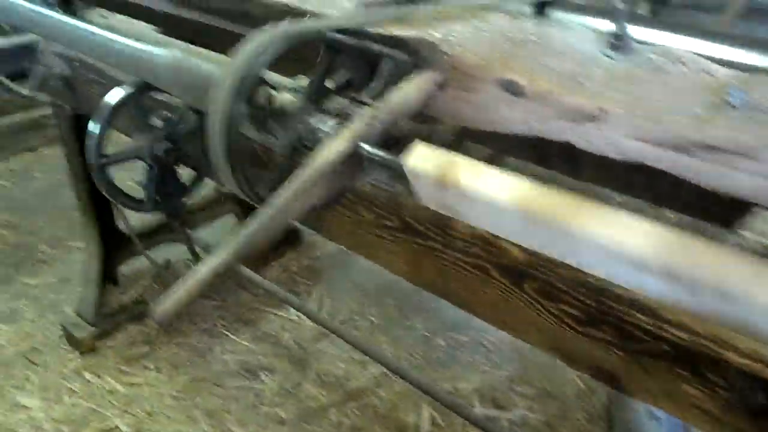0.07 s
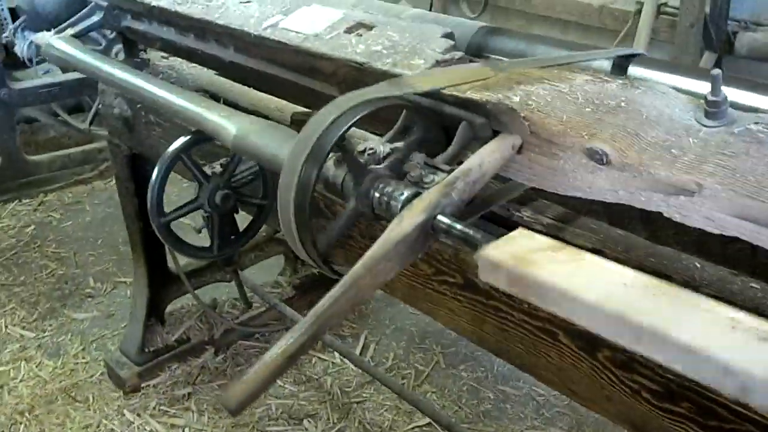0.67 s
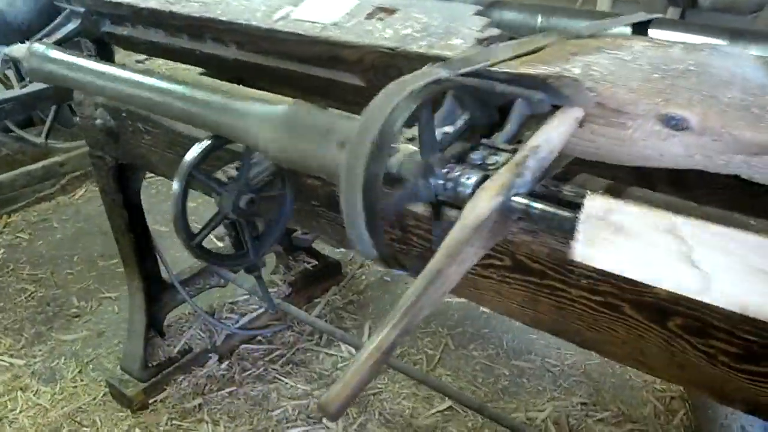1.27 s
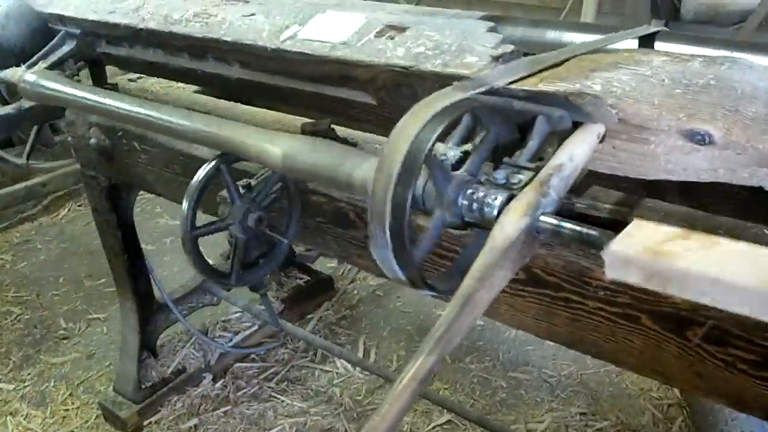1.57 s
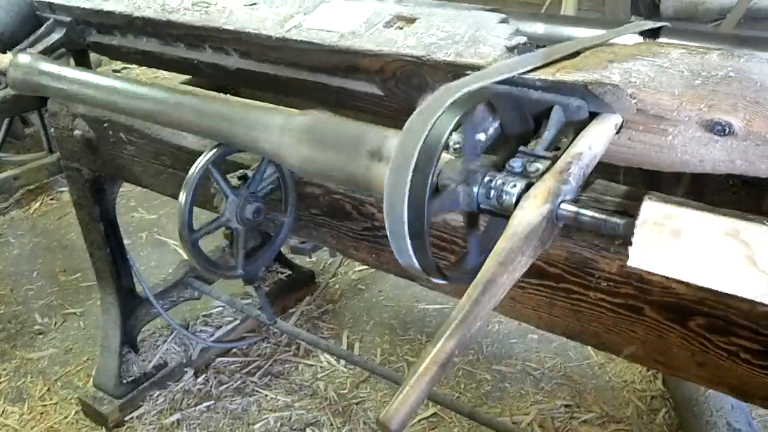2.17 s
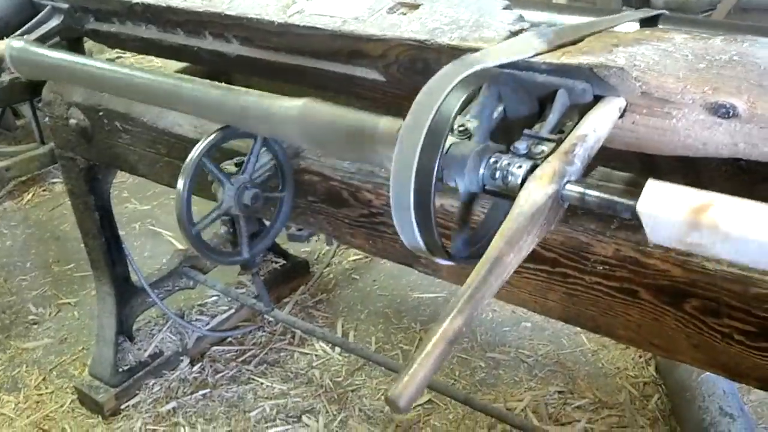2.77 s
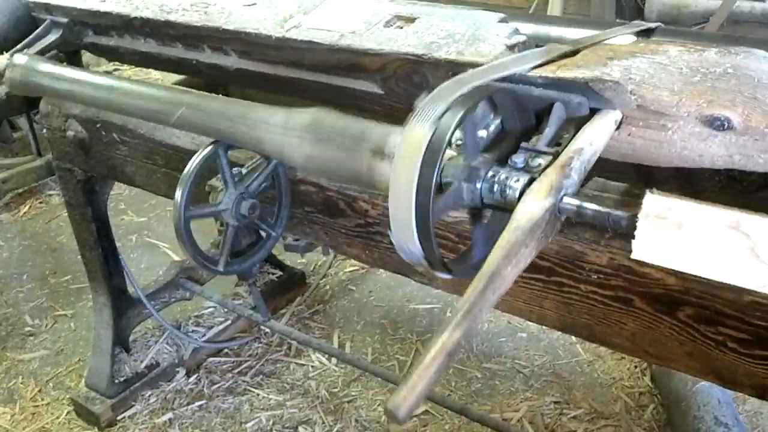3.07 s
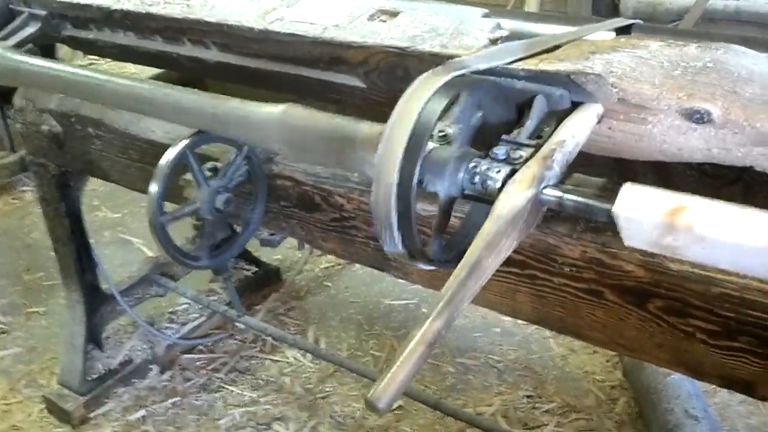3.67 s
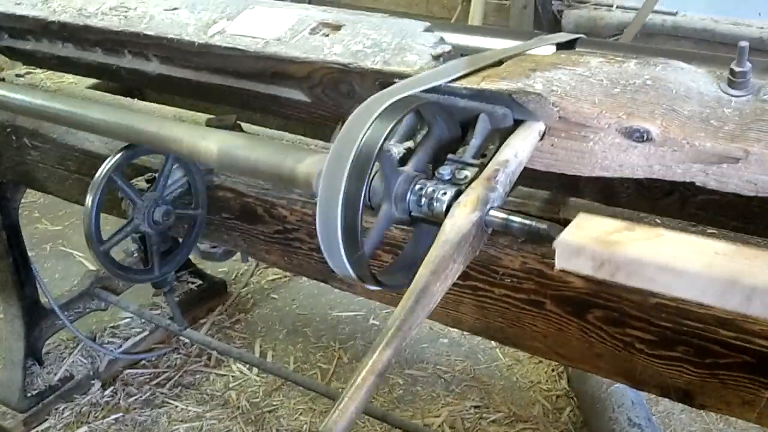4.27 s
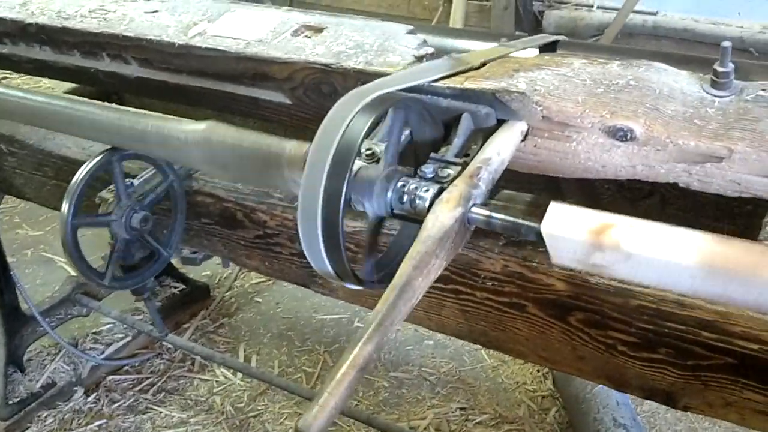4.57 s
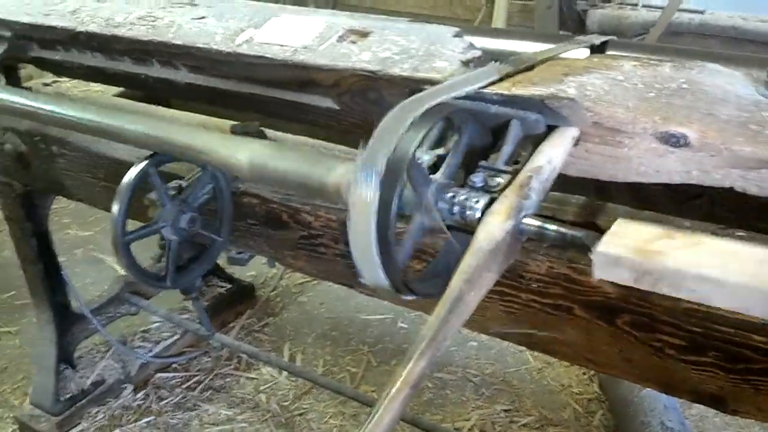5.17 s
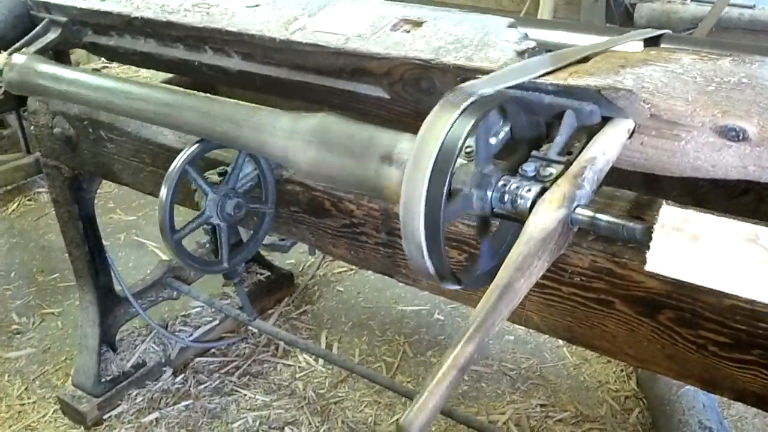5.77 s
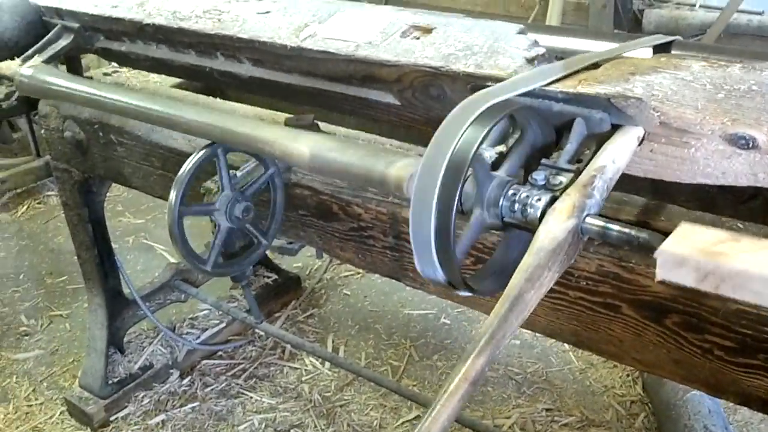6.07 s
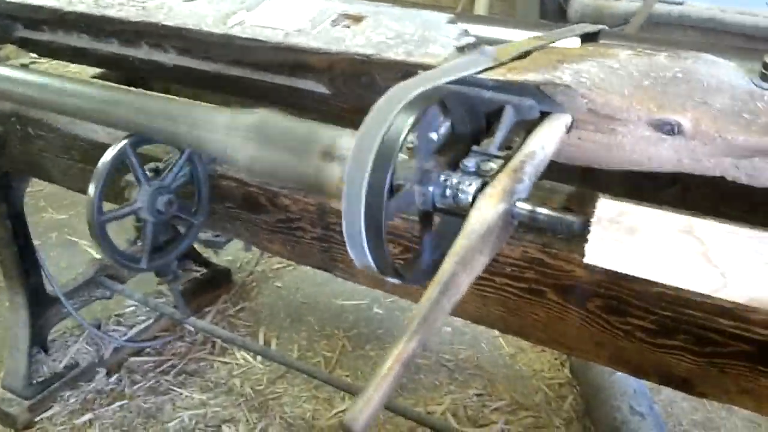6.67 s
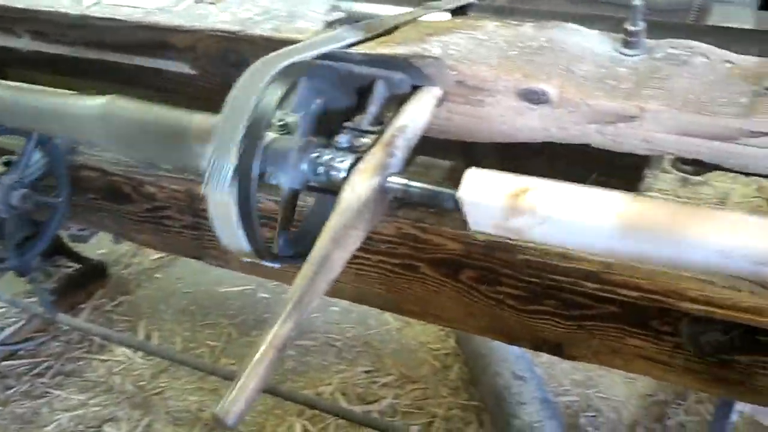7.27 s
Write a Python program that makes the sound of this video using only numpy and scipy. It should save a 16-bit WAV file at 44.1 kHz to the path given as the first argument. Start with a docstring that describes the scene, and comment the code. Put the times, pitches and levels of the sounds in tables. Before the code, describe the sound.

Close up in a workshop with a short echo, a wood lathe's cutter rasps into a slowly turning piece of wood about twice a second. Each cut rings and chatters, then throws a hissing spray of chips, with an occasional sharp tick of splintering. Between and beneath the cuts, the machine keeps up a fluttering whine, a hum and a low belt rumble from start to finish.

```python
"""In a workshop, an old belt-driven wood lathe is running close by.
A twelve-toothed cutter whines on a fast shaft, whose speed wavers with each lap of the belt.
About twice a second it bites the blank, the slowly turning piece of wood. Each bite slows the
shaft a little, makes the wood chatter once a shaft turn and throws a hiss of chips.
Underneath, the shaft hums and the belts and bearings rumble."""
import sys
import numpy as np
from scipy import signal
from scipy.fft import rfft, irfft
from scipy.io import wavfile
from scipy.ndimage import uniform_filter1d, map_coordinates

SR = 44100
rng = np.random.default_rng(int(sys.argv[2]) if len(sys.argv) > 2 else 0)


def log_audio(samples):
    """Write samples as a 16-bit WAV file to the path given in sys.argv[1]."""
    # one column per channel
    frames = np.atleast_2d(samples).T
    # limit to full scale, then quantise
    limited = np.clip(frames, -1, 1)
    pcm = np.round(limited * 32767).astype(np.int16)
    wavfile.write(sys.argv[1], SR, pcm)


N = 327663
TIME = np.arange(N) / SR
HZ = np.fft.rfftfreq(N, 1 / SR)


def gain_of(db):
    """Turns decibels into a number to multiply by."""
    return 10 ** (np.asarray(db) / 20)


def evened(x):
    """Scales a signal to an average size (rms) of one."""
    return x / np.sqrt(np.mean(x ** 2) + 1e-20)


def look_up(table, hz):
    """Reads between the rows of a frequency table, on a scale of octaves."""
    row_hz, value = np.transpose(table)
    return np.interp(np.log(hz + 1), np.log(row_hz + 1), value)


def drift(per_s):
    """A smooth random wander of size one that changes per_s times a second."""
    values = rng.standard_normal(4096)
    knots = np.arange(0, N, 32)
    smooth = map_coordinates(values, [knots / SR * per_s], order=3, mode="wrap")
    return evened(np.interp(np.arange(N), knots, smooth))


def coloured(x, spectrum):
    """Filters x by a table of frequencies and levels, then scales it to size one."""
    return evened(irfft(rfft(x) * gain_of(look_up(spectrum, HZ)), N))


def tone(cycles):
    """A pure tone of size one, from a running count of its cycles."""
    return np.sqrt(2) * np.cos(2 * np.pi * cycles)


def swells(events, levels_db, idle_db, rise, fall, flat_top, late_s, grain_db, grain_per_s):
    """A level in dB that swells above idle at each event, made uneven by the grain of the wood."""
    t = TIME[::64]
    power = gain_of(idle_db) ** 2
    for (middle_s, length_s, *_), db in zip(events, levels_db):
        offset = 2 * (t - middle_s - late_s) / length_s
        distance = np.maximum(-offset / rise, offset / fall)  # 1 where the swell is half as strong
        power = power + (gain_of(db) * .5 ** (distance ** flat_top)) ** 2
    return np.interp(TIME, t, 10 * np.log10(power)) + grain_db * drift(grain_per_s)


# The shaft's basic speed. Each row: time in seconds, turns per second.
SHAFT_SPEED = [(0.0, 51.87), (0.4, 51.47), (1.0, 51.7), (1.3, 51.44), (1.9, 51.59), (3.1, 51.33),
               (3.7, 51.51), (4.1, 51.28), (5.0, 51.33), (5.5, 51.57), (5.9, 51.3), (6.35, 51.62),
               (6.8, 51.17), (7.43, 51.52)]

def shaft_turns(bite_depth, wobble=.25, sag=.301, slip=.025, turns_per_lap=9):
    """Counts turns: the speed swings once a belt lap, sags in each bite and wavers as the belt slips."""
    speed = np.interp(TIME, *np.transpose(SHAFT_SPEED))
    laps = (np.cumsum(speed) / SR - 1.55) / turns_per_lap  # fastest 1.55 turns in
    speed += wobble * np.cos(2 * np.pi * laps)
    speed -= sag * (bite_depth - bite_depth.mean())
    return np.cumsum(speed + slip * drift(25)) / SR


# The hum's tones. Each entry: level in dB, at 3, 4, 5, .. times the shaft's speed.
HUM_TONES = [-50, -45, -49.5, -47, -56, -44, -46, -54.5, -45, -85, -72, -60, -45, -51.5, -57]

def shaft_hum(turns, flutter_db=3):
    """The unbalanced shaft shakes the bed of the lathe at low multiples of its speed."""
    return sum(gain_of(db + flutter_db * drift(9)) * tone(k * turns + rng.random())
               for k, db in enumerate(HUM_TONES, 3))


# The colour of the rumble. Each row: frequency in Hz, relative level in dB.
RUMBLE_COLOUR = [(20, -22), (45, -27), (75, -11.5), (100, -8.5), (125, -2), (160, -2), (280, 2.5),
                 (450, 3.5), (650, 0.5), (900, -4.5), (1500, -7), (3000, -12.5), (8000, -31)]

def belt_rumble(level_db=-31.13, waver_db=.32):
    """Flat belts, pulleys and plain bearings make a low, nearly steady noise."""
    return gain_of(level_db + waver_db * drift(4)) * coloured(rng.standard_normal(N), RUMBLE_COLOUR)


# The whine's overtones. Each entry: level in dB before swelling, at 3, 4, 5, .. times the tooth rate.
WHINE_OVERTONES = [-38, -37.5, -36, -43.5, -40.5, -39.5, -67, -51.5, -42.5, -46, -41, -56]

def cutter_whine(turns, teeth, tooth_db, ring_db, hiss_db, flutter_db=4):
    """The teeth chop air and wood; the overtones flutter, and swell with the hiss of the cut."""
    push = 1 + .13 * drift(45)  # no two turns push alike
    out = gain_of(tooth_db + .5) * push * tone(teeth + .03 * drift(50))
    out += gain_of(tooth_db - 12.5) * tone(16 * turns)  # a softer tone, a musical fourth higher
    swell = gain_of(.93 * (hiss_db - hiss_db.mean()))
    creep = drift(70)  # the belt creeps unevenly
    for k, db in enumerate(WHINE_OVERTONES, 3):
        level = swell * gain_of(db + flutter_db * drift(60))
        out += level * tone(k * (teeth + .055 * creep) + rng.random())
    ring = tone(7 * (teeth + .014 * creep))  # the cutter itself rings at this pitch
    return out + gain_of(ring_db) * ring


# The cutter's bites. Each row: middle in seconds, length in seconds, then relative levels in dB
# of the ringing wood, the rasp of the cut and the tone of the teeth.
CUTTER_BITES = [(0.082, 0.26, -26.5, -27.0, -27), (0.5, 0.22, -32, -24.5, -25),
                (0.992, 0.347, -27.5, -27.5, -27), (1.4, 0.251, -23.5, -26, -32.5),
                (1.92, 0.377, -26.0, -39, -32), (2.352, 0.215, -23.0, -32, -36.5),
                (2.786, 0.287, -23.0, -31.5, -35.5), (3.237, 0.2755, -22.5, -27, -54),
                (3.69, 0.279, -23.5, -29.5, -35), (4.147, 0.224, -22.0, -25, -47),
                (4.595, 0.311, -24.5, -29.0, -38), (5.037, 0.215, -21, -24.5, -37),
                (5.566, 0.21, -25, -32, -34.5), (5.978, 0.322, -24.5, -27.5, -45),
                (6.422, 0.277, -26.0, -30.0, -34.5), (6.859, 0.304, -24.0, -27.5, -39),
                (7.27, 0.24, -27.5, -28, -35)]

def bite_levels():
    """Levels over time for wood, rasp and teeth: a bite rings the wood first, and the rasp follows."""
    wood, rasp, tooth = np.transpose(CUTTER_BITES)[2:]
    return (swells(CUTTER_BITES, wood, idle_db=-39.5, rise=.88, fall=1.33, flat_top=3.24,
                   late_s=-.026, grain_db=1.5, grain_per_s=22),
            swells(CUTTER_BITES, rasp, idle_db=-35.5, rise=1.14, fall=.83, flat_top=1.6,
                   late_s=.021, grain_db=2.74, grain_per_s=26),
            swells(CUTTER_BITES, tooth, idle_db=-39, rise=1.06, fall=1.16, flat_top=5.2,
                   late_s=.0066, grain_db=1.4, grain_per_s=25))


def blows(turns, spectrum, lift_db, scatter, rough, count):
    """One blow a turn rings a body; four lesser blows a turn lift every fourth multiple of that rate."""
    k = np.arange(1, count)
    mean_speed = np.mean(SHAFT_SPEED, axis=0)[1]
    body = gain_of(look_up(spectrum, k * mean_speed))
    # delay each tone so that the body rings after it is struck, then scatter the delays
    lag = signal.hilbert(np.log(np.r_[body, body[::-1]])).imag[:len(k)] / (2 * np.pi)
    lag = lag - lag[body.argmax()] + scatter * rng.standard_normal(len(k))
    levels = body * gain_of(lift_db * (k % 4 == 0))
    angle = np.linspace(0, 1, 2049)
    one_turn = levels @ tone(k[:, None] * angle - lag[:, None])
    return evened(np.interp(turns % 1, angle, one_turn) * (1 + rough * drift(90)))


# How the wood rings. Each row: frequency in Hz, relative level in dB.
WOOD_RING = [(400, -50), (650, -25), (950, -16), (1030, -32.5), (1080, -6), (1135, -2), (1185, 0.5),
             (1238, -1.5), (1290, -4.5), (1345, 0), (1450, -27), (1550, -40)]
# How the cutter and its frame ring. Each row: frequency in Hz, relative level in dB.
FRAME_RING = [(150, -60), (700, -13), (1250, -12), (1420, -2), (1520, -5), (1650, 3), (1750, -3),
              (1860, -4), (2100, -4), (2500, -4), (3000, -8), (4400, -11), (6000, -16), (7500, -27)]

def chatter(turns, teeth, wood_db, rasp_db, breakup_db=-25, lag_teeth=.15):
    """The wood sings at twice the tooth rate, or in a deep bite bursts once a turn; the frame buzzes."""
    burst_share = 1 / (1.5 + np.exp((breakup_db - wood_db) / 6))
    bursts = blows(turns + .0016 * drift(60), WOOD_RING, lift_db=2, scatter=.04, rough=.14, count=34)
    singing = tone(2 * (teeth - lag_teeth) + .088 * drift(60))
    wood = burst_share * bursts + (1 - burst_share) * singing
    frame = blows(turns + .0014 * drift(80), FRAME_RING, lift_db=4, scatter=1, rough=.3, count=140)
    frame *= 1 + .2 * tone(turns)
    return gain_of(wood_db - .76) * wood + gain_of(rasp_db - 5) * frame


# Bursts of chips, most of them late in a bite. Each row: peak time in seconds, length in seconds,
# then relative levels in dB of the hiss, the fine spray and the cutter's shrill ring.
CHIP_THROWS = [(0.155, 0.19, -23.5, -30, -47), (0.336, 0.042, -23, -43, -39.0),
               (0.598, 0.11, -24.5, -37, -46), (1.034, 0.27, -20.5, -34, -29),
               (1.22, 0.095, -23, -52, -30.5), (1.48, 0.29, -23.5, -33, -30),
               (1.92, 0.19, -21, -34.5, -26.5), (2.395, 0.29, -25.5, -34, -29.5),
               (2.69, 0.068, -23, -32, -34), (2.818, 0.16, -21.5, -30.5, -32),
               (3.297, 0.13, -23.5, -38, -28.5), (3.598, 0.069, -20.5, -54, -21.5),
               (3.723, 0.13, -19.5, -30, -35), (4.168, 0.22, -23, -46, -34), (4.64, 0.28, -24.5, -30, -33),
               (5.115, 0.12, -21.5, -28, -34.5), (5.58, 0.15, -23.5, -34, -33),
               (5.975, 0.12, -21.5, -31.5, -42), (6.45, 0.22, -24, -31.5, -33),
               (6.813, 0.24, -24.5, -27.5, -50), (7.308, 0.69, -29.5, -38, -69),
               (7.406, 0.45, -29, -29, -32.5)]

def chip_levels():
    """Levels over time for hiss, spray and ring: each burst of chips comes to a sharp peak."""
    hiss, spray, ring = np.transpose(CHIP_THROWS)[2:]
    return (swells(CHIP_THROWS, hiss, idle_db=-29.5, rise=1, fall=1, flat_top=2.07,
                   late_s=.004, grain_db=1.82, grain_per_s=24),
            swells(CHIP_THROWS, spray, idle_db=-35, rise=.68, fall=1.1, flat_top=2.4,
                   late_s=.0049, grain_db=1.93, grain_per_s=24),
            swells(CHIP_THROWS, ring, idle_db=-45, rise=.65, fall=.79, flat_top=1.04,
                   late_s=.011, grain_db=.5, grain_per_s=18))


# The colours of the rasp, the chips' hiss and the spray. Each row: frequency in Hz, relative level in dB.
RASP_COLOUR = [(200, -7), (500, -15), (900, -7.5), (1500, 1.5), (2200, 1), (3000, -7), (5000, -14)]
HISS_COLOUR = [(800, -19.5), (2000, 1), (3000, 0.5), (3900, 5.5), (4400, 3.5), (5200, 7), (5800, 10.5),
               (6700, -4), (7600, -6), (9000, -8.5), (14000, -33)]
SPRAY_COLOUR = [(3000, -11), (7000, 13), (9300, 1.5), (10800, 2), (12500, 1), (14000, 6.5), (15500, 2),
                (17000, -12)]

def flying_chips(turns, teeth, rasp_db, hiss_db, spray_db):
    """Wood fibres snap in puffs, at every tooth and most at one spot of the turn."""
    puffs = 1 + .17 * tone(turns) + .12 * tone(2 * turns + .2) + .076 * tone(4 * turns + .51)
    puffs *= 1 + .52 * tone(teeth)
    layers = (RASP_COLOUR, rasp_db - 6), (HISS_COLOUR, hiss_db - .7), (SPRAY_COLOUR, spray_db + .49)
    out = 0
    for colour, level_db in layers:
        grit_db = 1.5 * np.minimum(rng.exponential(1, N // 16 + 1), 4)
        grit = np.repeat(gain_of(grit_db), 16)[:N]  # a new strength every 16 samples
        out += gain_of(level_db) * coloured(puffs * grit * rng.standard_normal(N), colour)
    return out


# Splinters, scrapes and knocks. Each row: start in seconds, level in dB, fade time in seconds,
# centre frequency in Hz, width in octaves.
SPLINTERS = [(.088, -21, .004, 4300, .7), (.128, -17.5, .014, 220, 1.5), (.435, -26, .14, 800, .7),
             (2.785, -24, .025, 4200, .6), (3.052, -25.5, .035, 5000, .7), (3.64, -21, .004, 3500, 1.2),
             (5.338, -24, .012, 4300, .8), (5.35, -17, .005, 4000, 1.1)]

def splinters_and_knocks():
    """Each torn splinter, scrape or knock is a sudden burst of noise that dies away."""
    out = np.zeros(N)
    for start_s, db, fade_s, hz, octaves in SPLINTERS:
        band = gain_of(-6 * (np.log2((HZ + 1) / hz) / octaves) ** 2)
        noise = evened(irfft(band * rfft(rng.standard_normal(N)), N))
        fade = (TIME >= start_s) * np.exp(-abs(TIME - start_s) / fade_s)
        out += gain_of(db) * noise * fade
    return out


# How strong the workshop's echo is. Each row: frequency in Hz, level in dB.
ECHO_LEVEL = [(100, -4.5), (400, -5), (620, -6), (850, -14), (1050, 2), (1300, -10.5), (2200, -1.5),
              (4000, -14.5), (7500, -10), (10000, 0), (15000, 3)]
# How long it lasts. Each row: frequency in Hz, seconds to fade by 60 dB.
ECHO_TIME = [(100, 0.58), (1000, 0.61), (4000, 0.075), (15000, 0.053)]

def workshop_echo(sound):
    """Dense reflections reach the left and right sides, the treble dying first."""
    hz, t, noise = signal.stft(rng.standard_normal((2, SR // 2)), SR, nperseg=256)
    fade_rate = np.log(1000) / look_up(ECHO_TIME, hz)[:, None]
    fade = np.sqrt(2 * fade_rate / SR) * np.exp(-fade_rate * t)  # same energy, long or short
    level = gain_of(look_up(ECHO_LEVEL, hz))[:, None]
    tail = signal.istft(noise * fade * level, SR, nperseg=256)[1]
    tail = np.pad(tail, ((0, 0), (128, 0)))  # arrives about 3 ms late
    return signal.fftconvolve(sound[None], tail, axes=1)[:, :N]


def scene(tooth_count=12, drag_turns=.026):
    """The turning shaft sets the pace; the direct sound is mostly on the left, the echo on both sides."""
    wood_db, rasp_db, tooth_db = bite_levels()
    hiss_db, spray_db, ring_db = chip_levels()
    bite_depth = uniform_filter1d(gain_of(wood_db), size=SR // 10)
    bite_depth /= bite_depth.max()
    turns = shaft_turns(bite_depth)
    teeth = tooth_count * turns
    contact = turns - drag_turns * bite_depth  # the deeper the bite, the later its blow lands
    whine = cutter_whine(turns, teeth, tooth_db, ring_db, hiss_db)
    noises = chatter(contact, tooth_count * contact, wood_db, rasp_db)
    noises += flying_chips(turns, teeth, rasp_db, hiss_db, spray_db)
    noises += belt_rumble() + splinters_and_knocks()
    direct = shaft_hum(turns) + whine + noises
    # the whine gets less echo, so its tones stay clear
    echo = workshop_echo(noises + gain_of(-3) * whine)
    return np.array([direct, gain_of(-31) * direct]) + echo


# How wide the sound is. Each row: frequency in Hz, relative level in dB of the side (left minus right).
STEREO_WIDTH = [(30, -17), (120, -14.5), (280, -13), (600, -5), (820, 0), (1000, -11), (1500, -0.5),
                (1900, 2.5), (2400, -2.5), (16000, -1)]

def record(dry, ceiling=.72, top_hz=15800):
    """Widens the stereo, clips the rare highest peaks and cuts the very top of the treble."""
    # each channel has a delayed copy of the other taken from it
    delay = np.exp(-2j * np.pi * HZ * 16 / SR)
    to_mid = 1 - delay
    to_side = (1 + delay) * gain_of(look_up(STEREO_WIDTH, HZ))
    # the weaker of mid and side is turned down further
    to_mid, to_side = to_mid * abs(to_mid), to_side * abs(to_side)
    total = np.hypot(abs(to_mid), abs(to_side))
    left, right = rfft(dry)
    mid = (left + right) * to_mid / total
    side = (left - right) * to_side / total
    wide = irfft(np.array([mid + side, mid - side]), N)
    lowpass = signal.firwin(511, top_hz, window=("kaiser", 9), fs=SR)
    return signal.oaconvolve(np.clip(wide, -ceiling, ceiling), lowpass[None], "same", axes=1)


dry = scene()
out = record(dry)
log_audio(out)
```